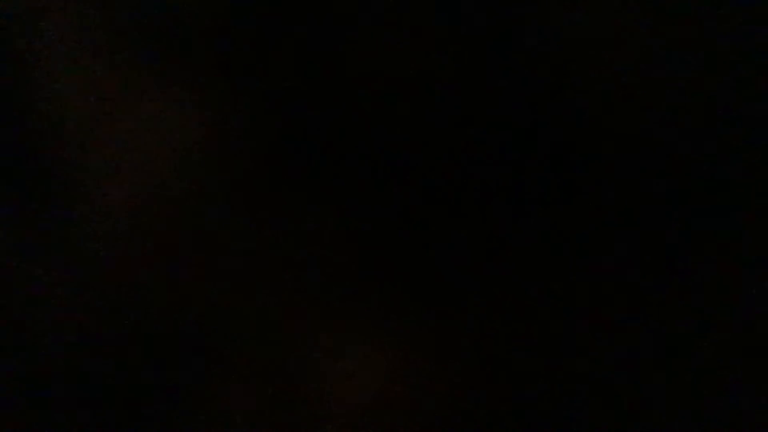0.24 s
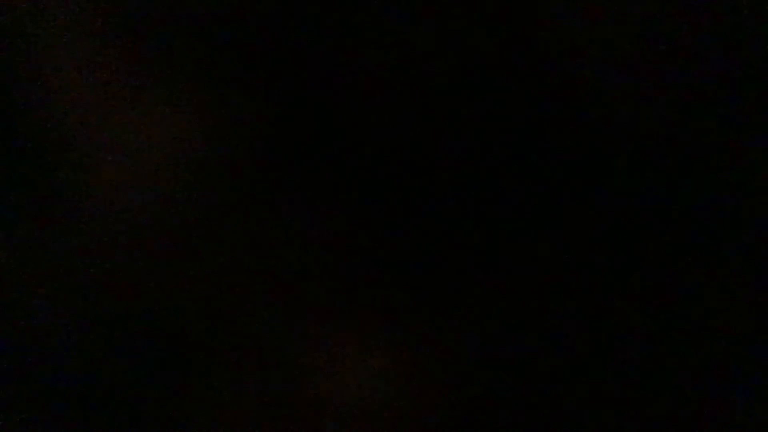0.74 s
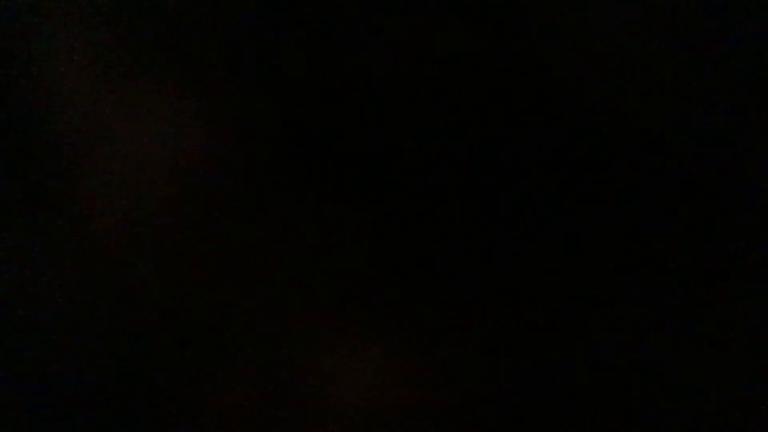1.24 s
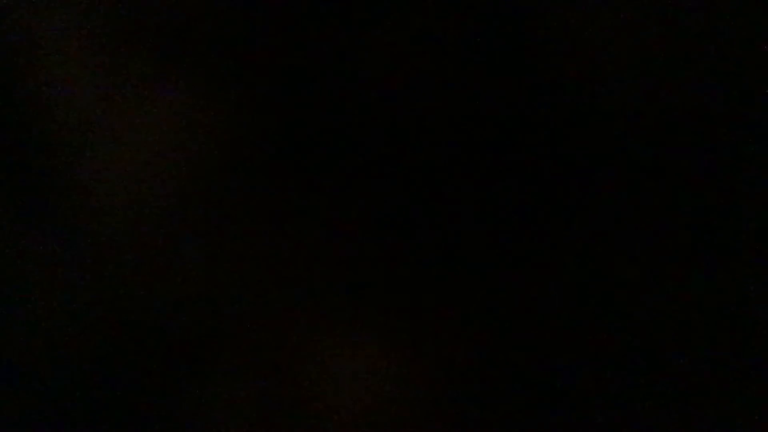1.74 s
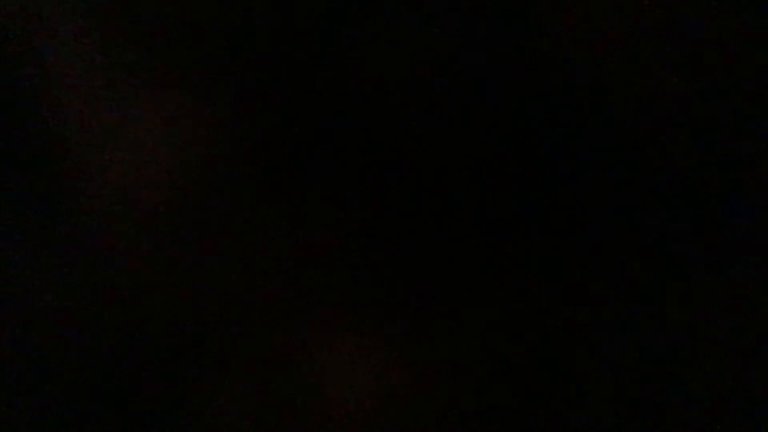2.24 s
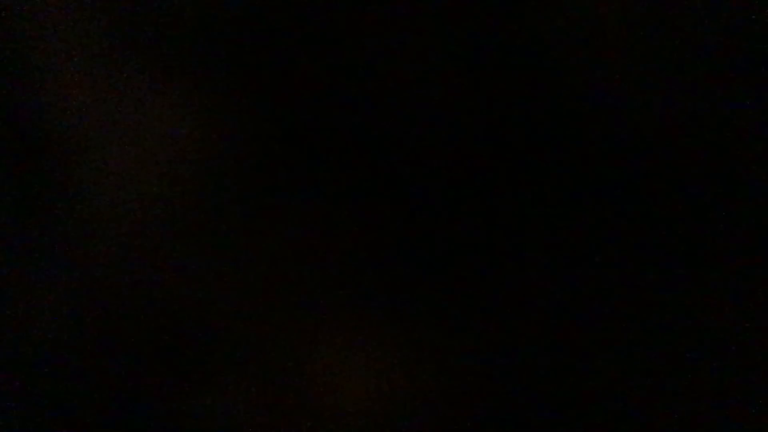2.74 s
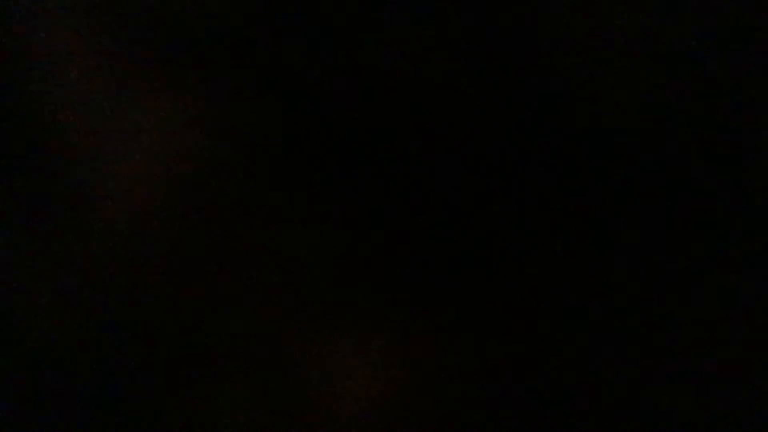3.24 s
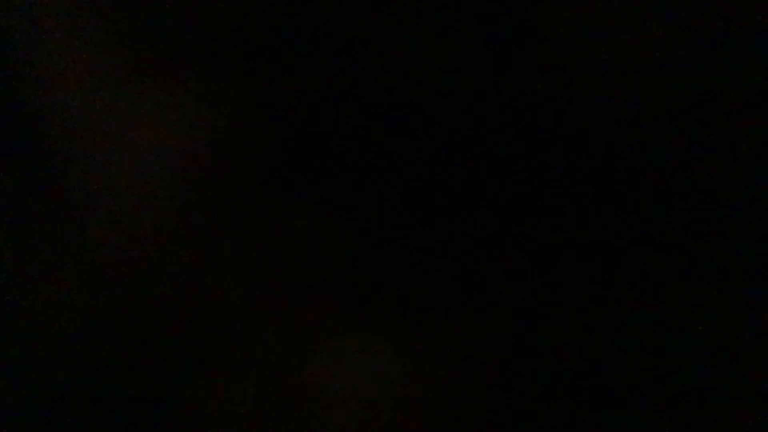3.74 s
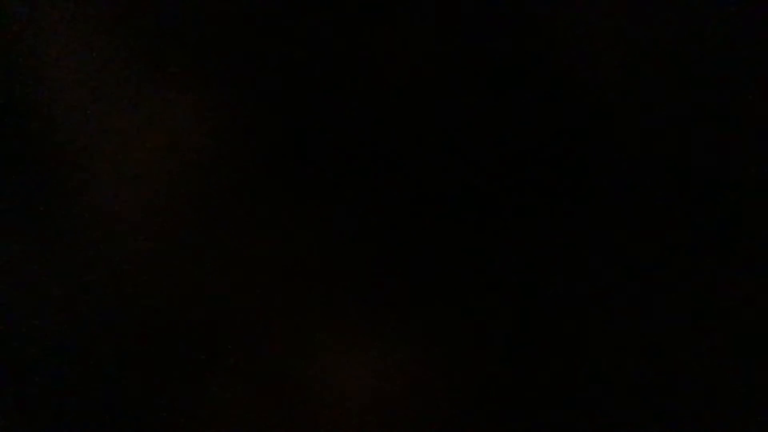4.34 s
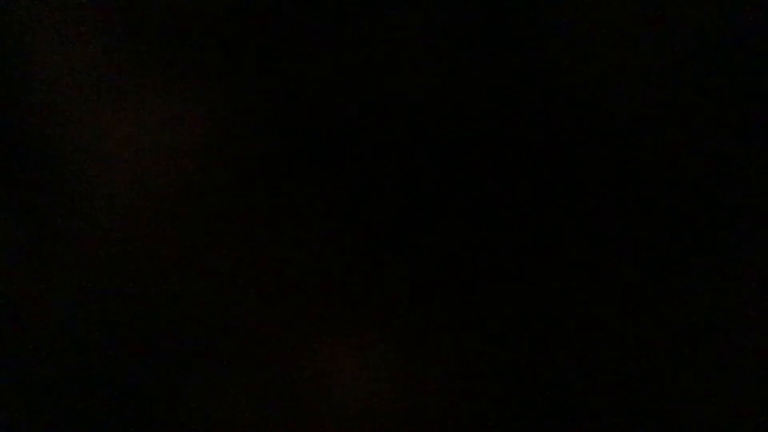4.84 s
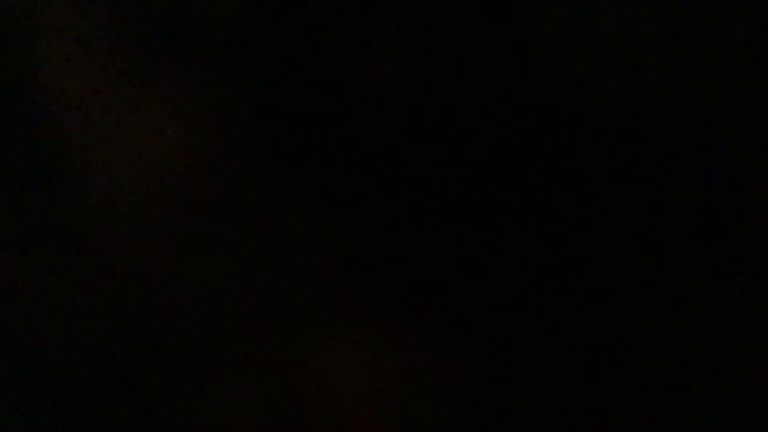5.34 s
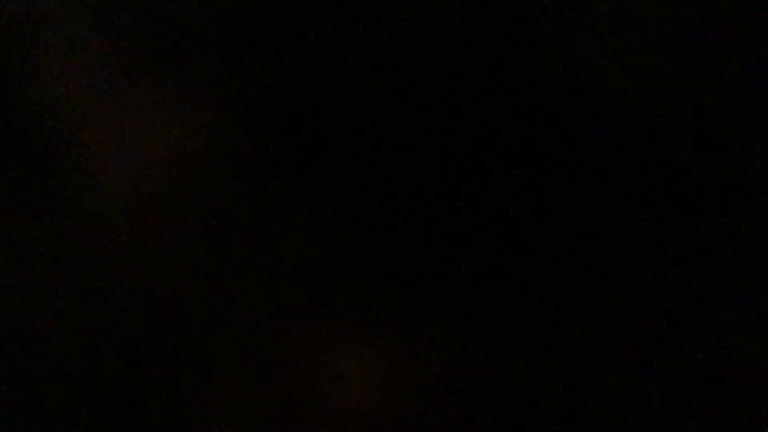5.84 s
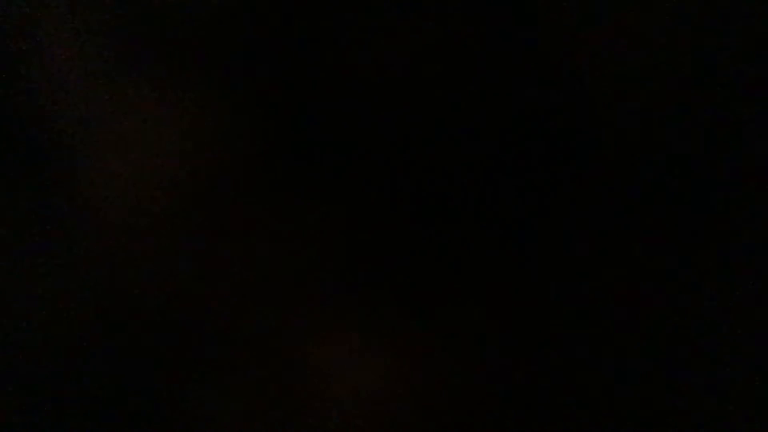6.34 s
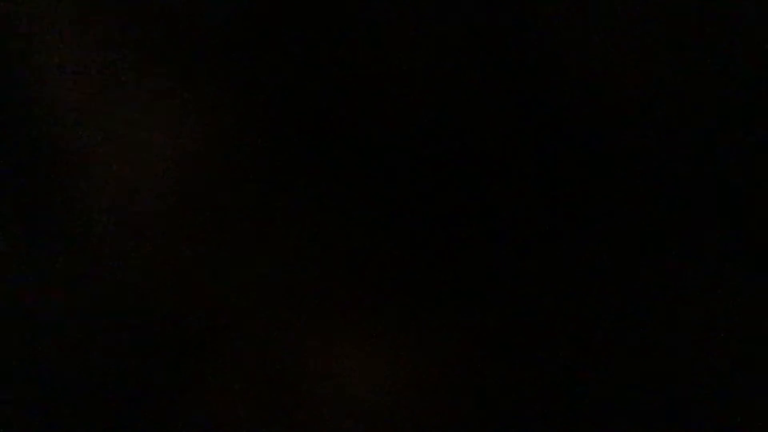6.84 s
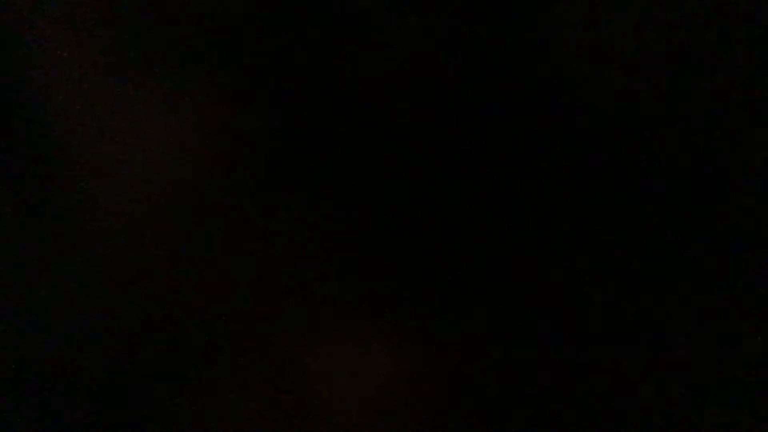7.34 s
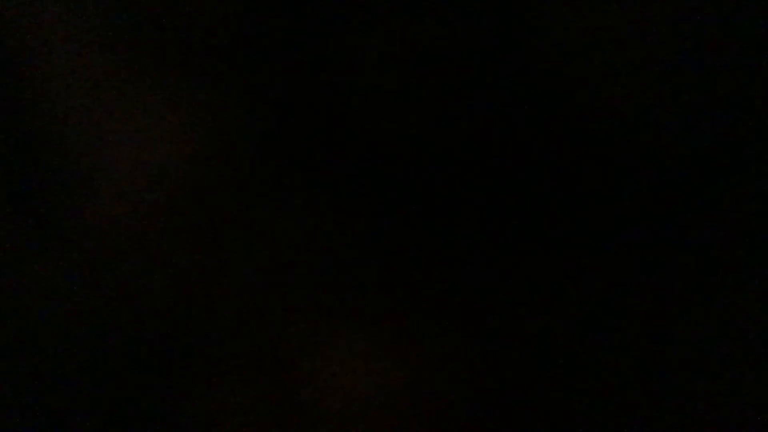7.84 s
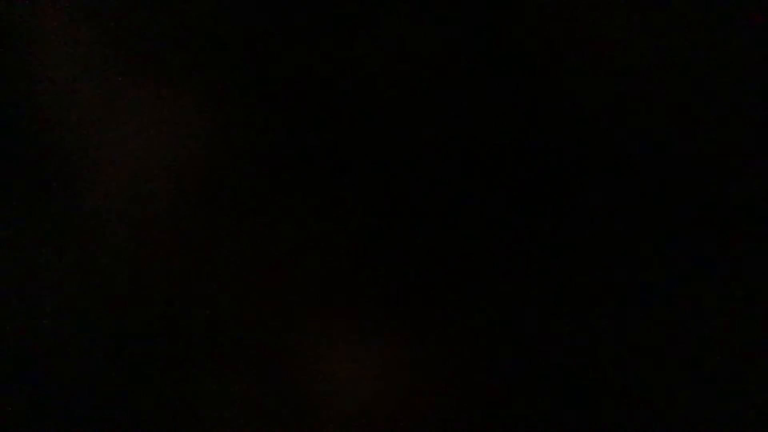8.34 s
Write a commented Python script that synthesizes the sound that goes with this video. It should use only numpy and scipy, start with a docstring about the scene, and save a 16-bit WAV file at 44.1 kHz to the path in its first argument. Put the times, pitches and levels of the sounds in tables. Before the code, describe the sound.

A bathroom exhaust fan runs without pause in a small room. Its deep electric hum beats and throbs quickly, with a strong octave overtone and a fainter whine above. Muffled air rumbles through the housing. A very faint metallic rattle and light microphone hiss sit on top. About halfway, one sharp dry tick sounds and vanishes at once. The fan continues unchanged.

```python
"""A steady, beating hum fills a small room: a bathroom exhaust fan is running, with air rumbling through it.
The motor hums at twice the mains frequency; its turning rotor adds shaft tones, sidebands and a whine.
These are sums of cosines; the rushing air is noise shaped by the resonances of housing and room.
A faint rattle of ringing noise bursts and a pulsing microphone hiss lie above the hum.
One sharp tick, a sudden step that dies away at once, sounds about halfway."""
import sys
import numpy as np
from scipy.fft import rfft, irfft, next_fast_len
from scipy.io import wavfile
from scipy.ndimage import map_coordinates

SR = 44100
rng = np.random.default_rng(int(sys.argv[2]) if len(sys.argv) > 2 else 0)


def generate_wav(sig):
    """Save sig (samples, or channels by samples) to the path in sys.argv[1] as 16-bit PCM at SR."""
    pcm = np.round(np.clip(np.atleast_2d(sig).T, -1, 1) * 32767).astype(np.int16)
    wavfile.write(sys.argv[1], SR, pcm)


N = 379260  # samples, 8.6 s


def amp(db):
    """Turn decibels into a gain."""
    return 10 ** (np.asarray(db) / 20)


def unit(x):
    """Scale x to an rms of 1."""
    return x / np.sqrt(np.mean(x ** 2) + 1e-20)


def along(points, hz):
    """Read a curve of (Hz, value) points, evenly spaced in pitch rather than in Hz."""
    point_hz, values = np.transpose(points)
    return np.interp(np.log(hz + 1), np.log(point_hz + 1), values)


def wobble(rate):
    """Draw a smooth curve through random points, rate points a second."""
    points = rng.standard_normal(int(N * rate / SR) + 4)
    return map_coordinates(points, [np.arange(N) * rate / SR])


def filtered(x, response):
    """Multiply the spectrum of x by a gain that depends on frequency."""
    padded = next_fast_len(N + SR // 2)  # spare room, so that the end does not wrap onto the start
    hz = np.fft.rfftfreq(padded, 1 / SR)
    return irfft(rfft(x, padded) * response(hz), padded)[:N]


def noise(response):
    """Make coloured noise with an rms of 1."""
    return unit(filtered(rng.standard_normal(N), response))


def bell(hz, centre, width):
    """Give the power curve of one resonance, 1 at its centre."""
    return 1 / (1 + (2 * (hz - centre) / width) ** 2)


def rotation(drift):
    """Add up the turning angles of the shaft, whose speed drifts by a small share, and the magnetic pull."""
    # shaft speed before the drift, which dips and partly recovers: time_s, speed_turns_per_s
    speed = [(0, 45.21), (6, 45.09), (8.6, 45.15)]
    hum_hz = 119.92
    t = np.arange(N) / SR
    shaft_hz = np.interp(t, *np.transpose(speed)) * (1 + drift * wobble(2))
    shaft = 2 * np.pi * np.cumsum(shaft_hz) / SR
    pull = 2 * np.pi * hum_hz * t
    return shaft, pull


def hum(pull, waver_db, overtone_waver_db, swell_db):
    """The iron core is squeezed twice per mains cycle; the hum creeps up, its overtones swell and sink."""
    # hum and overtones: multiple of the hum frequency, level_db (rms, before the slow changes below)
    harmonics = [(1, -40.5), (2, -46), (3, -63), (4, -74.5)]
    rise_db_per_s = 0.08
    swell_period_s, swell_peak_s = 2.6, 3.0
    t = np.arange(N) / SR
    rise_db = rise_db_per_s * (t - t.mean())
    root_db = rise_db + waver_db * wobble(4)
    swell = np.cos(2 * np.pi * (t - swell_peak_s) / swell_period_s)
    # the overtones rise twice as fast as the hum itself
    overtone_db = 2 * rise_db + swell_db * swell + overtone_waver_db * wobble(5)
    out = np.zeros(N)
    for multiple, db in harmonics:
        order = round(multiple)
        change_db = root_db if order == 1 else overtone_db
        out += amp(db + change_db) * np.sqrt(2) * np.cos(order * pull)
    return out


def rotor_tones(shaft, pull, level_db, waver, phase_scatter_rad):
    """The magnetic pull beats with the slightly off-centre rotor; turbulence makes each tone waver."""
    # tones at sums of shaft and hum multiples: shaft order, hum order, level_db (rms, before the waver)
    tones = [(2, 0, -64.8), (3, 0, -65.6), (4, 0, -65.0), (5, 0, -55.9), (6, 0, -57.1), (9, 0, -69.1),
             (10, 0, -66.6), (-1, 1, -65.9), (1, 1, -47.3), (2, 1, -50.5), (3, 1, -62.0), (4, 1, -60.3),
             (13, 1, -66.8), (-2, 2, -60.8), (-1, 2, -50.4), (1, 2, -51.8), (2, 2, -65.7), (12, 2, -75.4),
             (16, 2, -74), (18, 2, -82.9)]
    out = np.zeros(N)
    for shaft_order, hum_order, db in tones:
        # the room shifts each tone's phase, which softens the beats
        phase = phase_scatter_rad * rng.standard_normal()
        angle = shaft_order * shaft + hum_order * pull + phase
        out += amp(db) * np.sqrt(2) * (1 + waver * wobble(7)) * np.cos(angle)
    return amp(level_db) * out


def whine(shaft, pull, swing_rad, half_turn_swing_rad, waver, dispersion_rad):
    """The bars pass the poles unevenly within each turn, which flanks every whine tone with sidebands."""
    # tones at the bar-passing rate plus a hum multiple: hum order, level_db (rms, before the waver)
    bar_tones = [(-1, -62), (0, -58), (1, -59), (2, -69)]
    rotor_bars = 15
    swing_fade_db = 0.5  # how much the swing shrinks with each step up in hum order
    swing = swing_rad * np.sin(shaft) + half_turn_swing_rad * np.cos(2 * shaft)
    out = np.zeros(N)
    for hum_order, db in bar_tones:
        order = round(hum_order)
        tone_swing = amp(-swing_fade_db * order) * swing
        # phase lag grows with the square of the order, which softens the buzz
        lag = dispersion_rad * order ** 2
        angle = rotor_bars * shaft + tone_swing + order * pull - lag
        out += amp(db) * np.sqrt(2) * (1 + waver * wobble(12)) * np.cos(angle)
    return out


def air(level_db, swell_db, gust_db, gust_hz):
    """Turbulent flow, coloured by the housing; its deepest rumble swells and sinks on its own."""
    # air rushing through fan and duct: pitch_hz, level_db (per Hz, relative)
    rush_curve = [(25, -38), (45, -24), (62, -9.5), (76, -2.5), (102, -0.5), (190, -5), (310, -4),
                  (400, -10.5), (480, -17.5), (660, -13), (860, -26), (1250, -35.5), (1800, -46),
                  (3000, -62)]
    # resonances of housing and room that lift the rush: pitch_hz, width_hz, lift_db
    resonances = [(145.7, 11, 4.5), (239, 12, 9.5), (1107, 170, 6.5), (1355, 41, 5), (1490, 70, 6),
                  (1610, 53, 1), (1866, 120, 7)]

    def colour(hz):
        """Add the resonances to the curve of the rush."""
        lift_db = sum(db * bell(hz, centre, width) for centre, width, db in resonances)
        return amp(along(rush_curve, hz) + lift_db)

    rush = noise(colour)
    rumble = filtered(rush, lambda hz: 1 / (1 + (hz / gust_hz) ** 2) ** 2)
    gust_gain = amp(gust_db * wobble(3.6))
    swell_gain = amp(level_db + swell_db * wobble(6.2))
    return swell_gain * (rush + (gust_gain - 1) * rumble)


def tick(peak_db, decay_s):
    """One dry tick: a sudden step that relaxes without ringing."""
    tick_s = 4.131
    age = np.arange(N) / SR - tick_s
    return amp(peak_db) * (age >= 0) * np.exp(-np.abs(age) / decay_s)


def rattle(shaft, pull, level_db, depth_db, slow_waver_db, fast_waver_db):
    """A loose part chatters most when the shaft's wobble and the magnetic shake push the same way."""
    # ringing modes of the rattle: pitch_hz, width_hz, level_db (relative)
    modes = [(1930, 88, -4), (2340, 150, -1.5), (4520, 250, -12), (6200, 220, -12.5)]
    shake = np.cos(shaft) + np.cos(pull - shaft) + np.cos(pull)
    strength_db = depth_db * shake + slow_waver_db * wobble(3.7) + fast_waver_db * wobble(17)
    contacts = amp(strength_db) * rng.standard_normal(N)
    ring = filtered(contacts, lambda hz: sum(amp(db) * bell(hz, centre, width) for centre, width, db in modes))
    return amp(level_db) * unit(ring)


def hiss(level_db, flicker_db, flicker_s):
    """Microphone hiss that jumps up in short regular pulses and sinks back after each."""
    # colour of the hiss: pitch_hz, level_db (per Hz, relative)
    hiss_curve = [(100, 0), (2800, 1), (4800, 0.5), (6200, -1), (7400, -5), (8800, -4), (10500, -8.5),
                  (15000, -12)]
    flicker_hz = 30
    since_pulse = np.arange(N) / SR % (1 / flicker_hz)
    pulse_db = flicker_db * np.exp(-since_pulse / flicker_s)
    return amp(level_db + pulse_db) * noise(lambda hz: amp(along(hiss_curve, hz)))


def scene():
    """Add up the fan, the tick and the hiss in one channel."""
    shaft, pull = rotation(drift=0.0005)
    core = hum(pull, waver_db=-0.1, overtone_waver_db=0.95, swell_db=0.96)
    rotor = rotor_tones(shaft, pull, level_db=0, waver=0.12, phase_scatter_rad=1.83)
    bars = whine(shaft, pull, swing_rad=0.6, half_turn_swing_rad=0.087, waver=0.047, dispersion_rad=0.85)
    flow = air(level_db=-48.0, swell_db=1.55, gust_db=1.5, gust_hz=109)
    click = tick(peak_db=-29, decay_s=0.0006)
    chatter = rattle(shaft, pull, level_db=-90.5, depth_db=8.5, slow_waver_db=0.2, fast_waver_db=1.7)
    floor = hiss(level_db=-82.6, flicker_db=3.5, flicker_s=0.0049)
    return (core + rotor + bars + flow + click + chatter + floor)[None]


def record(dry):
    """Fade the sound in and out briefly and keep nothing above the band limit."""
    fade_s, top_hz = 0.004, 15800
    t = np.arange(N) / SR
    fade = np.clip(np.minimum(t, t[::-1]) / fade_s, 0, 1)
    return filtered(dry[0] * fade, lambda hz: hz < top_hz)[None]


dry = scene()
out = record(dry)
generate_wav(out)
```